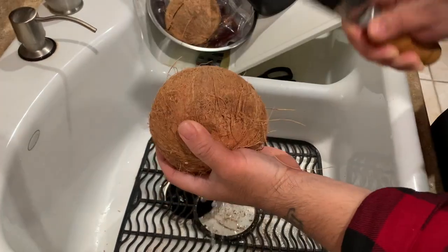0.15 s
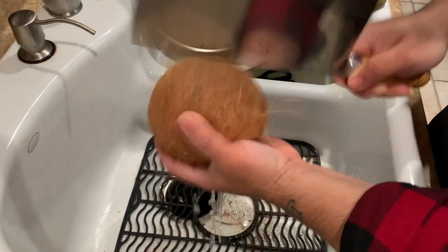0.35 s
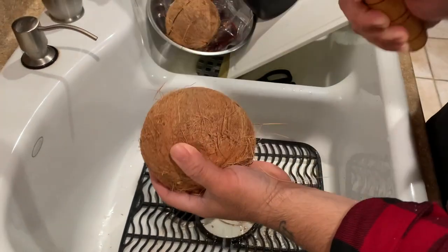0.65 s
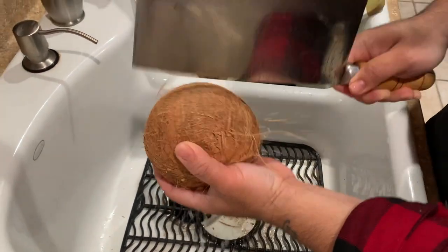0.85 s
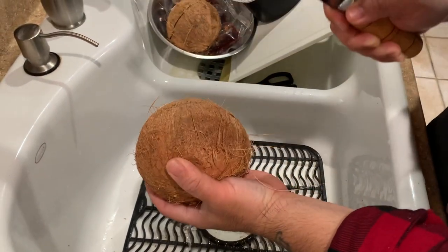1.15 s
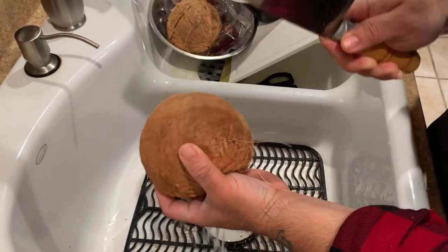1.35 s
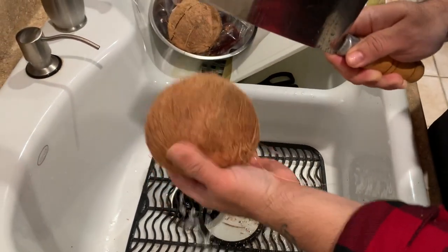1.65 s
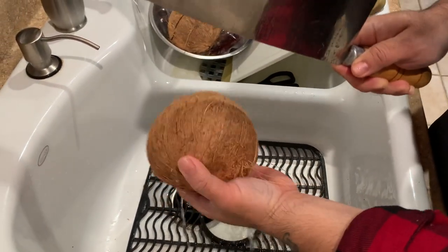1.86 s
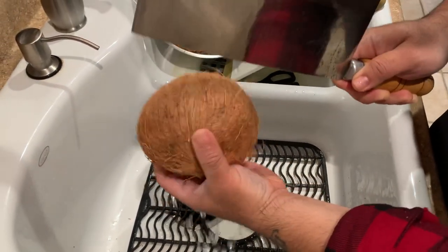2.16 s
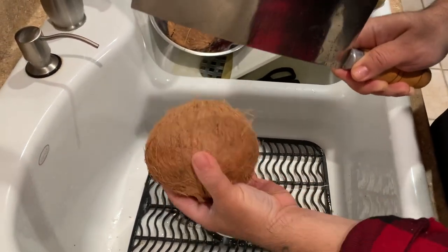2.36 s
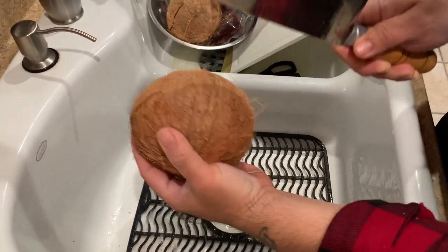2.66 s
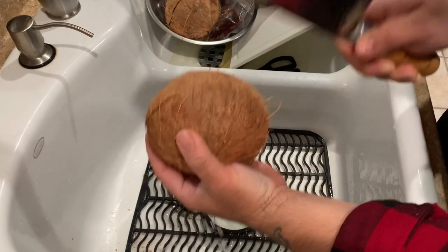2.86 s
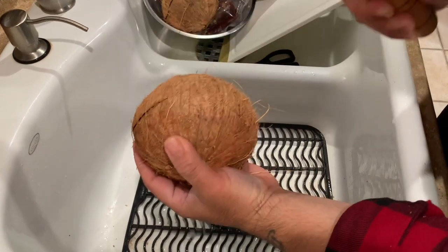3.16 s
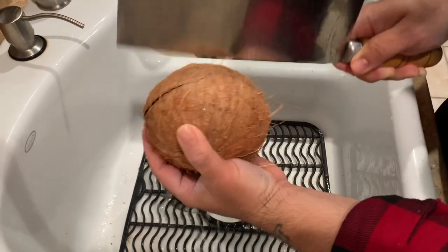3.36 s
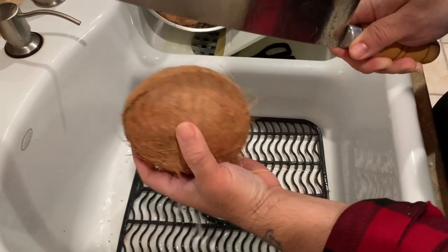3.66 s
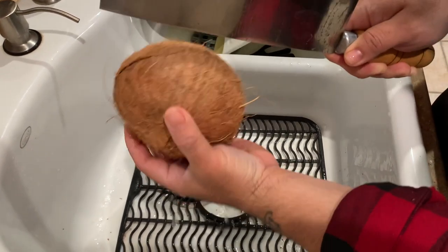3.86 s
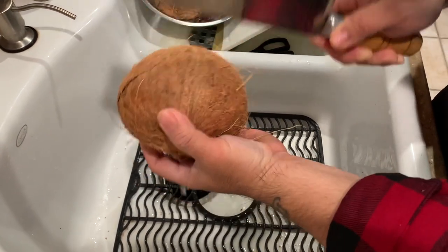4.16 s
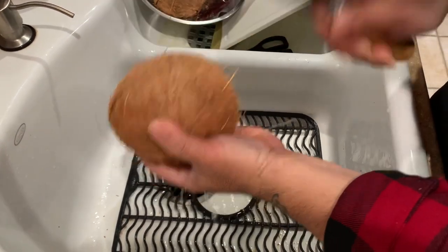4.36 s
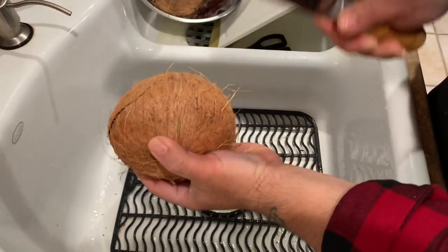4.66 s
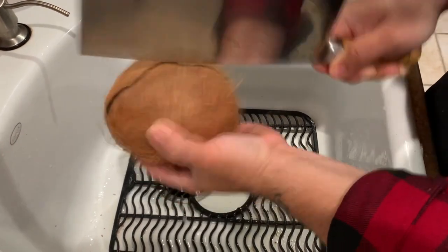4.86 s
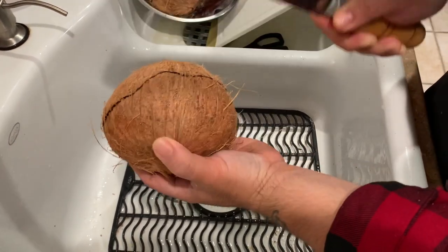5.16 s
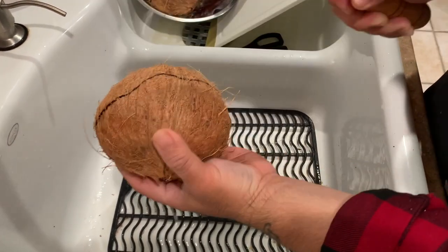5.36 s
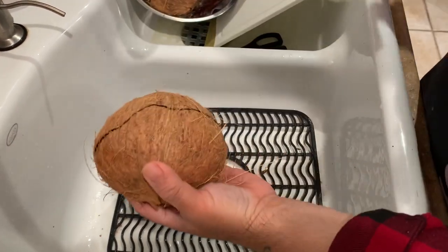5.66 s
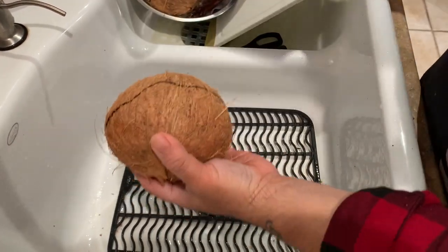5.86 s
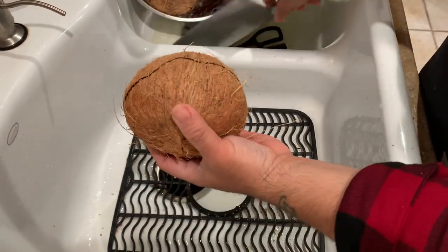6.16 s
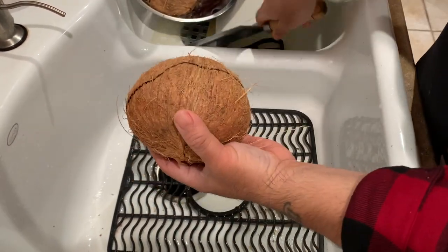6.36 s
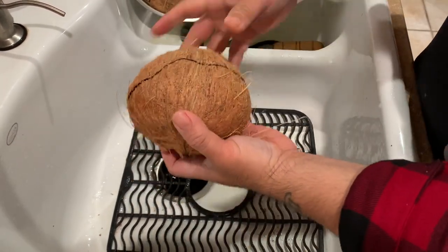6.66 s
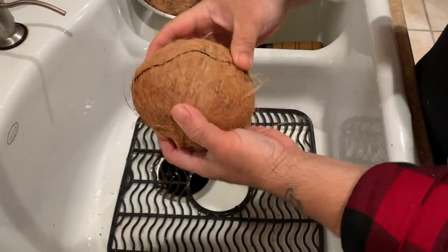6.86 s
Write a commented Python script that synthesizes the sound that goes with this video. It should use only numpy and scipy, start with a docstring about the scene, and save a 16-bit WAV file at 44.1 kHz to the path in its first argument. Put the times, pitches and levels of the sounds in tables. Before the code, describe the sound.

Close, slightly compressed stereo sound at a kitchen sink, with quiet low rumble and a short, hard-walled echo. Juice spatters finely from the start, with crisp drips. Loud hollow knocks of a cleaver's back on a coconut fall at about 0.4 and 0.8 seconds: snappy, woody, almost without ring. Until 2.8 the trickle fades and revives with many bright drops, small sloshes and soft low landings of the nut in the palm. Knocks at 2.9 and 3.2 sound lower in the shell, with a thin steely ring. Sparser drops follow, and a firmer dull catch at 3.9. The last knocks come at 4.4, low, and 4.85, higher, both ringing. The stream nearly stops; faint high tinkles tick from 5.4 to 6.05. The cleaver touches the next basin lightly at 6.1-6.3, then clatters strongly at 6.5 and 6.6, booming and rattling, dying away as a little trickling returns by 7.

```python
"""Juice trickles and spatters on a sink mat while the back of a cleaver knocks on a coconut held above it.
At each knock filtered noise makes the crack and fading sine tones make the hollow shell and thin blade.
Between knocks the hand tosses and catches the nut, with low tones and dull slaps; later come faint tinkles.
Last, the cleaver is laid down clattering in the next basin: booms, rattles and rings. Low rumble lies below.
A small two-port microphone with a compressor listens close by."""
import sys
import numpy as np
from scipy import signal
from scipy.fft import rfft, irfft, next_fast_len
from scipy.io import wavfile
from scipy.ndimage import uniform_filter1d, minimum_filter1d, map_coordinates

SR = 44100
rng = np.random.default_rng(int(sys.argv[2]) if len(sys.argv) > 2 else 0)


def voltage_ratio(decibels):
    """Convert decibels (scalar or array-like) to amplitude ratios, 20 dB per decade."""
    exponent = np.asarray(decibels, float) / 20
    return 10 ** exponent


def transcribe(u):
    """Save the signal u as a 16-bit wav file named by the first command-line argument.

    u: samples, shape (n,) or (channels, n), limited to [-1, 1]; the rate is SR.
    q: integer samples, one column per channel.
    """
    v = np.clip(np.atleast_2d(u).T, -1, 1)
    q = np.round(v * 32767).astype(np.int16)
    wavfile.write(sys.argv[1], SR, q)


N = 309878  # length in samples

# In all tables t60 is the time in which a sound falls by 60 dB.
# Tones of the blade. Each row: pitch in Hz, level in dB, t60 in seconds.
BLADE = [(2230, -18.5, 0.16), (2750, -12, .07), (3500, -18.5, 0.16), (5130, -18, .12), (8950, -16, .1),
         (4243, -5, 0.66)]
# Colour of the woody knock, also used for rattles and slaps. Each row: frequency in Hz, level in dB per Hz.
KNOCK = [(500, -10.5), (900, -5.5), (2000, -5.5), (4200, -6), (5500, -10.5), (7000, -23.5)]
# Colour of the sharp snap, also used for clinks. Each row: frequency in Hz, level in dB per Hz.
SNAP = [(3500, -26.5), (5500, -12), (8000, 5), (10000, 0.5), (13500, -2), (15500, -23), (16500, -25)]


def unit(x):
    """Scales a sound to an average (rms) level of 1."""
    return x / np.sqrt(np.mean(x ** 2) + 1e-20)


def along(points, hz):
    """Reads a curve of (Hz, value) points, with frequency on a log axis."""
    f, v = np.transpose(points)
    return np.interp(np.log(hz + 1), np.log(f + 1), v)


def filtered(x, response):
    """Multiplies the spectrum of x by a response that depends on frequency."""
    n = x.shape[-1]
    m = next_fast_len(n + 8192)
    spectrum = rfft(x, m) * response(np.fft.rfftfreq(m, 1 / SR))
    return irfft(spectrum, m)[..., :n]


def noise(colour, size):
    """Noise with the given colour, at rms 1."""
    return unit(filtered(rng.standard_normal(size), lambda hz: voltage_ratio(along(colour, hz))))


def wobble(rate):
    """A smooth random curve with rate knots a second."""
    knots = rng.standard_normal(int(N * rate / SR) + 4)
    return map_coordinates(knots, [np.arange(N) * rate / SR])


def fade(t, t60, rise):
    """A quick rise, then a fall of 60 dB in t60 seconds."""
    return voltage_ratio(-60 * t / max(t60, .002)) * (1 - np.exp(-t / rise))


def ring(t, modes, rise, scatter_db):
    """A struck object: fading sine tones, each at a new random strength around its level."""
    out = 0
    for hz, db, t60 in modes:
        strength = voltage_ratio(db + scatter_db * rng.normal())
        out = out + strength * fade(t, t60, rise) * np.sin(2 * np.pi * hz * t)
    return out


def add(track, s, sound):
    """Mixes a sound into a track at s seconds."""
    part = track[..., round(s * SR):][..., :sound.shape[-1]]
    part += sound[..., :part.shape[-1]]


def room_tail():
    """A fresh noisy answer of the kitchen with energy 1; each frequency dies at its own speed."""
    # Each row: frequency in Hz, t60 in seconds.
    decay = [(100, 0.23), (500, 0.37), (2000, 0.39), (6000, 0.33), (14000, 0.23)]
    hz, t, z = signal.stft(rng.standard_normal(SR * 3 // 4), SR, nperseg=256)
    fading = voltage_ratio(-60 * t / along(decay, hz)[:, None])
    tail = signal.istft(z * fading, SR, nperseg=256)[1]
    return np.pad(tail, (180, 0)) / np.linalg.norm(tail)  # starts 180 samples late


def washed(hit, wet_db, blur_hz):
    """One hit plus its answer; the walls gather it from all sides, so only its broad colour comes back."""
    grid = np.fft.rfftfreq(len(hit), 1 / SR)
    power = np.abs(rfft(hit)) ** 2
    colour = np.sqrt(np.abs(uniform_filter1d(power, max(round(blur_hz / grid[1]), 1))))
    answer = voltage_ratio(wet_db) * filtered(room_tail(), lambda hz: np.interp(hz, grid, colour))
    add(answer, 0, hit)
    return answer


def echoed(x, wet_db):
    """A stream of small sounds plus the kitchen's answer."""
    return x + voltage_ratio(wet_db) * signal.fftconvolve(x, room_tail())[:len(x)]


def blows():
    """Steel on shell: a snap of fibres, a woody knock, the hollow shell, the jolted hand, and the blade."""
    # Each row: start in seconds, strength in dB, shell pitch in Hz, blade ring in dB,
    # seconds until the grip chokes the ring.
    hits = [(0.375, -3, 489, -36.5, .3), (0.771, -1, 510, -34.5, 0.35), (2.891, 1, 333.9, -13, .19),
            (3.236, -1, 320, -20.5, .43), (4.377, 4, 296.7, -15.5, 0.42), (4.845, 2.5, 470, -13.5, 0.57)]
    # Tones of the shell. Each row: multiple of shell pitch, level in dB, t60 in seconds before damping.
    shell_modes = [(0.599, -9, 0.13), (.7, -1.5, 0.1), (1, 8.5, 0.05), (1.191, 6, 0.045),
                   (1.449, -7, 0.038), (1.9, -7.5, 0.041), (2.401, -11.5, 0.019)]
    # Colour of the jolt in the hand. Each row: frequency in Hz, level in dB per Hz.
    push_colour = [(30, -31.5), (55, -8.5), (110, 3), (200, 3.5), (300, -26)]
    dead_ring_db = -36.5  # blade ring of a blow that sinks in fully
    push_db, knock_db, snap_db = 1, 0.5, -3  # over the strength of the blow; the push is then lowered below
    push_loss, shell_damping = 0.48, 0.028  # per dB of livelier rebound: dB less push, faster shell fade
    # noise before the crack: level in dB over the blow, extra dB per dB of blade ring, time constant in seconds
    before_db, before_grows, before_s = -19, .45, 0.0034
    out, t = np.zeros(N), np.arange(SR) / SR
    for s, db, hz, ring_db, choke in hits:
        lively_db = ring_db - dead_ring_db
        damping = np.exp(-shell_damping * lively_db)
        tones = [(k * hz, level, damping * t60) for k, level, t60 in shell_modes]
        shell = ring(t, tones, rise=.003, scatter_db=2.0)
        push = noise(push_colour, size=len(t)) * fade(t, 0.11, rise=0.018)
        knock = noise(KNOCK, size=len(t)) * fade(t, 0.062, rise=0.003)
        snap_fade = fade(t, 0.015, rise=0.00085) + 0.12 * fade(t, .07, rise=.002)
        snap = noise(SNAP, size=len(t)) * snap_fade
        hit = voltage_ratio(push_db - push_loss * lively_db) * push + voltage_ratio(knock_db) * knock + voltage_ratio(snap_db) * snap
        add(out, s, washed(voltage_ratio(db) * hit[:SR // 5], wet_db=-6.5, blur_hz=320))
        # a short noise swells in just before each crack, louder where the blade ring is louder
        noise_before = noise(KNOCK, size=SR // 30) * np.exp(-t[SR // 30:0:-1] / before_s)
        add(out, s - 1 / 30, voltage_ratio(db + before_db + before_grows * lively_db) * noise_before)
        blade = ring(t, BLADE, rise=0.0029, scatter_db=3.5) * np.exp(-(t / choke) ** 4)
        add(out, s, voltage_ratio(ring_db) * blade)
        add(out, s + .003, washed(voltage_ratio(db) * shell[:SR // 5], wet_db=-13.5, blur_hz=200))
    return out


def flow_db():
    """Strength of the juice stream, sample by sample."""
    # Juice running out. Each row: time in seconds, spray level in dB.
    stream = [(0.0, -46.5), (0.21, -55), (0.95, -61), (1.1, -65), (1.57, -50), (2.046, -51.5), (2.36, -47),
              (2.65, -58), (3.45, -55.5), (4.232, -59), (5.2, -68), (5.3, -74), (5.968, -79.5), (6.1, -60),
              (6.9, -62.5), (7.027, -55.5)]
    return np.interp(np.arange(N) / SR, *np.transpose(stream))


def splat(t, hz):
    """One drop: a sharp tick and a burst of spray, strongest near one pitch."""
    # Each row: frequency in Hz, level in dB per Hz.
    colour = [(900, -16.5), (1500, -13), (3000, -3.5), (10000, 0), (14000, -5.5), (16500, -16)]
    burst = filtered(noise(colour, size=len(t)), lambda f: 0.05 + 1 / (1 + ((f - hz) / (0.11 * hz)) ** 2))
    tick = 1.7 * noise(colour, size=len(t)) * fade(t, 0.0022, rise=.0002)
    return tick + unit(burst) * (fade(t, 0.012, rise=0.00095) + 0.11 * fade(t, 0.28, rise=0.0018))


def juice():
    """A thin stream breaks on the mat as flickering spray, with sloshing, random drips and loud drops."""
    # Loud drops. Each row: start in seconds, level in dB, centre pitch in Hz.
    loud_drops = [(0.175, -30, 9730), (0.1975, -24, 9260), (0.211, -25, 4877), (0.2466, -27, 8970),
                  (0.4948, -22, 9860), (0.5355, -30, 4515), (0.9889, -33, 4104), (1.1711, -37, 10780),
                  (1.2306, -40, 10020), (1.3169, -26, 4550), (1.586, -26, 3740), (1.6496, -28.5, 5730),
                  (1.6791, -22.5, 4370), (1.7107, -25, 3850), (1.8599, -37, 6950), (1.8726, -24.5, 8860),
                  (1.9779, -22, 4220), (2.1057, -29.5, 10980), (2.1834, -31, 1877), (2.2632, -26.5, 10620),
                  (2.2851, -22, 7540), (2.4066, -29, 3603), (2.504, -24.5, 10000), (2.52, -31.5, 2483),
                  (2.7472, -31, 10330), (2.7978, -28.5, 9930), (2.837, -30, 4090), (3.004, -21.5, 9700),
                  (3.064, -29, 9100), (3.143, -40.5, 9400), (3.196, -36, 9800), (3.4982, -34, 9930),
                  (3.5189, -32.5, 8800), (3.5713, -34, 7960), (3.8462, -27.5, 10100), (3.8882, -30, 10700),
                  (3.9278, -25, 907), (3.9684, -30.5, 6510)]
    # Each row: frequency in Hz, level in dB per Hz.
    spray_colour = [(1200, -41), (2000, -19), (3200, -6.5), (4400, -1.5), (6500, -4.5), (10000, -3),
                    (13400, -6.5), (15500, -13), (16500, -28)]
    # Each row: frequency in Hz, level in dB per Hz.
    slosh_colour = [(600, -20.5), (1000, -4), (2000, -3.5), (3000, -3), (4500, -35)]
    # Juice sloshing inside the nut. Each row: middle in seconds, level in dB, length in seconds.
    sloshes = [(0, -60, .15), (0.904, -67, .12), (2.169, -61.5, .1), (2.596, -73.5, .25),
               (3.442, -57.5, .15), (4.333, -71.5, .08), (5.2, -66.5, .1)]
    slosh_floor_db = -87.5
    drips_per_s, low_hz, high_hz = 9, 4000, 10400
    drip_db, scatter_db = 16.5, 5  # highest level over the stream; how widely the drips fall below it
    t, clock, flow = np.arange(SR // 10) / SR, np.arange(N) / SR, flow_db()

    # about 60 tiny ticks a second, each dying out with a time constant of 2 ms
    ticks = (rng.random(N) < 60 / SR) * rng.exponential(size=N) * 1.2
    flicker = voltage_ratio(5.7 * wobble(39)) + signal.lfilter([1], [1, -np.exp(-1 / (.002 * SR))], ticks)
    spray = voltage_ratio(flow) * unit(flicker * noise(spray_colour, size=N))

    swell = voltage_ratio(slosh_floor_db)
    for s, db, length in sloshes:
        swell = swell + voltage_ratio(db) * np.exp(-((clock - s) / length) ** 2)
    slosh = swell * voltage_ratio(1.6 * wobble(41)) * noise(slosh_colour, size=N)

    when, pitch, size = rng.random((round(drips_per_s * N / SR), 3)).T
    drip_level = flow[(when * N).astype(int)] + drip_db + scatter_db * np.log(size)
    drips = zip(when * N / SR, drip_level, low_hz * (high_hz / low_hz) ** pitch)
    drops = np.zeros(N)
    for s, db, hz in [*loud_drops, *drips]:
        add(drops, s, voltage_ratio(db) * splat(t, hz))
    return spray + slosh + echoed(drops, wet_db=-11)


def laid_down():
    """The cleaver rocks to rest: each touch booms, chatters and rings basin and blade, damped by contact."""
    # Cleaver touching the basin. Each row: start in seconds, thud in dB, rattle in dB, clink in dB.
    contacts = [(6.121, -44.5, -31, -24), (6.134, -37, -27, -9.5), (6.152, -36, -27, -27),
                (6.173, -29, -19.5, -41.5), (6.195, -29.5, -23.5, -22.5), (6.301, -37.5, -28.5, -33.5),
                (6.47, -19.5, -3, -13), (6.584, -17, -11, -27.5), (6.625, -12.5, -13, -10.5),
                (6.644, -19, -14, -12.5), (6.683, -36.5, -25, -29)]
    # Colour of the boom. Each row: frequency in Hz, level in dB per Hz.
    thud_colour = [(40, -19), (60, -5.5), (150, -8.5), (350, -11.5), (600, -16), (900, -30)]
    # Basin and the things lying in it. Each row: pitch in Hz, level in dB, t60 in seconds.
    basin = [(802, -8, .12), (1065, -4, .07), (1215, -2, .06), (1790, -8, .07), (2207, -7, .1),
             (3079, -2, .09), (5520, -7, .08), (6130, -7, .07), (7060, -11, .07), (8270, -10, .08),
             (9620, -5, .07), (13110, -10, .08)]
    thud_t60, rattle_t60, clink_t60 = .22, .14, 0.1  # seconds
    lying_t60, ringing_db = .3, -10.5  # longest blade ring in seconds; ringing over the rattle in dB
    judders_per_s, judder_s = 79, 0.043  # tiny re-contacts after a touch; seconds in which they die out
    chatter_db = 2.5  # depth of the rattle's grain
    out, t = np.zeros(N), np.arange(SR // 2) / SR
    damped = [(hz, db, min(t60, lying_t60)) for hz, db, t60 in BLADE] + basin
    for s, thud_db, rattle_db, clink_db in contacts:
        chatter = unit(voltage_ratio(chatter_db * wobble(160)[:len(t)]))
        boom = voltage_ratio(thud_db) * noise(thud_colour, size=len(t)) * fade(t, thud_t60, rise=.004)
        rattle = voltage_ratio(rattle_db) * chatter * noise(KNOCK, size=len(t)) * fade(t, rattle_t60, rise=0.0065)
        clink = voltage_ratio(clink_db) * chatter * noise(SNAP, size=len(t)) * fade(t, clink_t60, rise=0.0013)
        # the first touch, then random smaller ones, each setting off the ring
        again = (rng.random(len(t)) < judders_per_s / SR) * rng.normal(size=len(t))
        judder = again * np.exp(-t / judder_s) + (t == 0)
        ringing = signal.fftconvolve(judder, ring(t, damped, rise=.001, scatter_db=4))[:len(t)]
        touch = boom + rattle + clink + voltage_ratio(rattle_db + ringing_db) * ringing
        add(out, s, washed(touch, wet_db=-6, blur_hz=120))
    return out


def catches():
    """Soft landings in the palm: a low tone of the shell and a dull slap."""
    # Nut landing in the palm. Each row: start in seconds, level in dB, pitch in Hz, t60 in seconds.
    landings = [(1.246, -37, 158.6, 0.081), (1.493, -38, 159, 0.13), (1.667, -29.5, 160.6, 0.09),
                (2.274, -27.5, 153, 0.042), (3.135, -36.5, 266, 0.08), (3.923, -18.5, 397, 0.021),
                (3.935, -15.5, 295.8, 0.055)]
    out, t = np.zeros(N), np.arange(SR // 4) / SR
    for s, db, hz, t60 in landings:
        tone = ring(t, [(hz, 0, t60), (1.6 * hz, -9, t60 / 2)], rise=.003, scatter_db=1)
        slap = voltage_ratio(-18) * noise(KNOCK, size=len(t)) * fade(t, 0.025, rise=0.0017)
        add(out, s, voltage_ratio(db) * (tone + slap))
    return echoed(out, wet_db=-11)


def tinkles():
    """Something small and hard ticks faintly on two high notes."""
    # Each row: start in seconds, level in dB.
    tick_list = [(5.41, -72), (5.477, -69.5), (5.51, -67.5), (5.535, -53), (5.784, -65.5), (6.05, -54)]
    # The two notes. Each row: pitch in Hz, level in dB, t60 in seconds.
    notes = [(3266, -6.5, .06), (3614, 5.5, 0.18)]
    out, t = np.zeros(N), np.arange(SR // 5) / SR
    for s, db in tick_list:
        add(out, s, voltage_ratio(db) * ring(t, notes, rise=.004, scatter_db=8))
    return out


def hum():
    """Low rumble as filtered noise, swollen by juice running into the drain."""
    # Machines beyond the walls. Each row: frequency in Hz, level in dB per Hz.
    colour = [(15, -45), (30, -29), (55, -12), (120, -4.5), (190, -5), (300, -12), (480, -22), (700, -27.5),
              (3000, -44), (12000, -52.5), (16500, -59)]
    middle_db, swell, waver_db = -62.5, 0.24, 2.5  # level at middling flow; dB per dB of flow; random drift
    flow = flow_db()
    level = middle_db + swell * (flow - flow.mean()) + waver_db * wobble(4.0)
    return voltage_ratio(level) * noise(colour, size=N)


def ports(x):
    """Both ports hear one sound with a lead; case and basin scatter part of it with drifting, mixed-up phase."""
    # The two ports. Each row: frequency in Hz, radians by which left leads, left minus right in dB,
    # likeness of the two from 0 to 1.
    pair = [(0, 0, 0, .99), (200, 0, 0, .96), (450, -.1, -2, .75), (1000, .4, 2, .25), (2100, .9, 3, .3),
            (3400, 1.6, 1, .5), (4800, 3.5, -4, .35), (5900, 5.2, -5, .5), (6900, 6.4, -1, .5),
            (7900, 4.6, -1, .85), (16500, -12.1, 0, .97)]
    f, lead, side, alike = np.transpose(pair)
    half = np.array([[.5], [-.5]])  # left, right
    z = signal.stft(np.roll(x, 100), nperseg=256, noverlap=224)[2]  # 100 samples later
    start_phase = 2 * np.pi * rng.random((len(z), 1))
    drift = start_phase + .12 * np.cumsum(rng.standard_normal(z.shape), axis=1)
    scattered = signal.istft(z * np.exp(1j * drift), nperseg=256, noverlap=224)[1][:N]
    scattered = scattered * x.std() / scattered.std()

    def turn(hz):
        """Angle that splits the sound into shared and scattered parts."""
        return np.arccos(np.clip(np.interp(hz, f, alike), 0, 1)) / 2

    def port(hz):
        """Level and phase of each port."""
        return voltage_ratio(half * np.interp(hz, f, side)) * np.exp(1j * half * np.interp(hz, f, lead))

    shared = filtered(x, lambda hz: np.cos(turn(hz)) * port(hz))
    # the scattered part has opposite sign in the two ports
    return shared + filtered(scattered, lambda hz: 2 * half * np.sin(turn(hz)) * port(hz))


def scene():
    """All sources at the microphone."""
    return ports(blows() + juice() + laid_down() + catches() + tinkles() + hum())


def compress(x, threshold_db, share, hold, release_db):
    """Gain drops at loud peaks, holds for hold seconds, then returns by release_db a second."""
    over = np.maximum(20 * np.log10(np.abs(x).max(0) + 1e-9) - threshold_db, 0) * share
    span = max(round(hold * SR), 1)
    held = -minimum_filter1d(-over, span, origin=(span - 1) // 2)
    ramp = release_db * np.arange(N) / SR
    cut = np.maximum.accumulate(held + ramp) - ramp
    # the smoothed gain lags the peak by about half a millisecond, so the first crack partly slips through
    return x * voltage_ratio(-uniform_filter1d(cut, size=61, origin=25))


def roll_off(x):
    """The treble ends steeply here."""
    return signal.sosfilt(signal.butter(12, 16650, fs=SR, output="sos"), x)


def record(dry):
    """The microphone's compressor, soft clipping at full scale and an upper frequency limit."""
    x = compress(dry, threshold_db=-9, share=.6, hold=.09, release_db=100)
    clipped = x / (1 + np.abs(x) ** 6) ** (1 / 6)
    mix = filtered(clipped, lambda hz: hz < 16600)
    return roll_off(mix)


dry = scene()
out = record(dry)
transcribe(out)
```